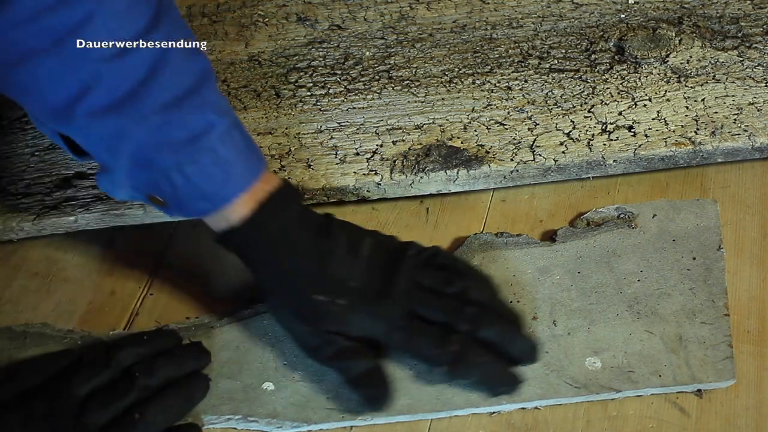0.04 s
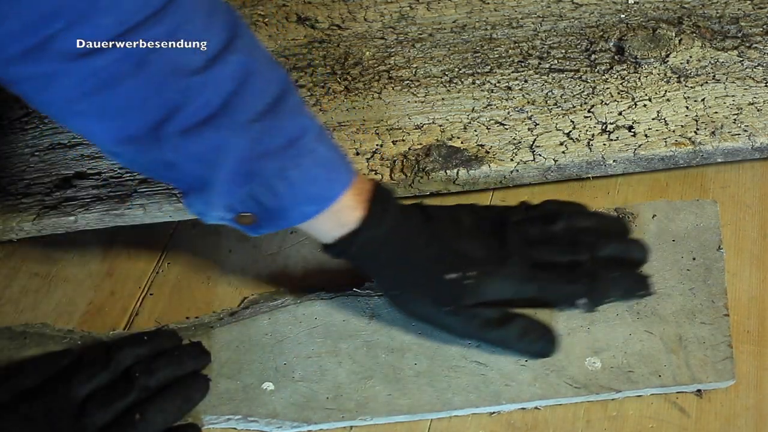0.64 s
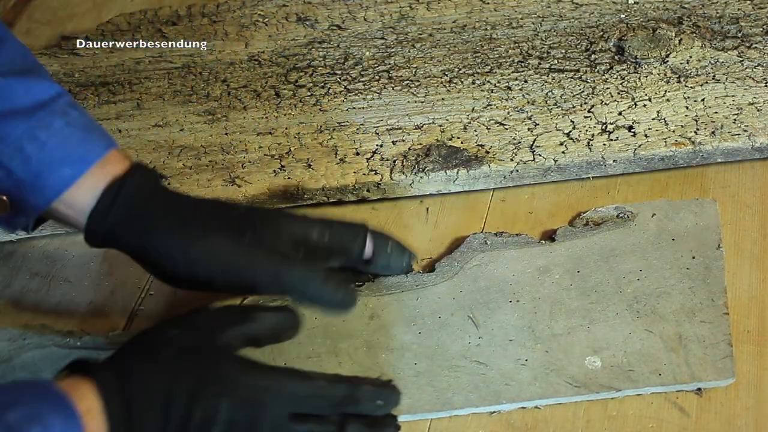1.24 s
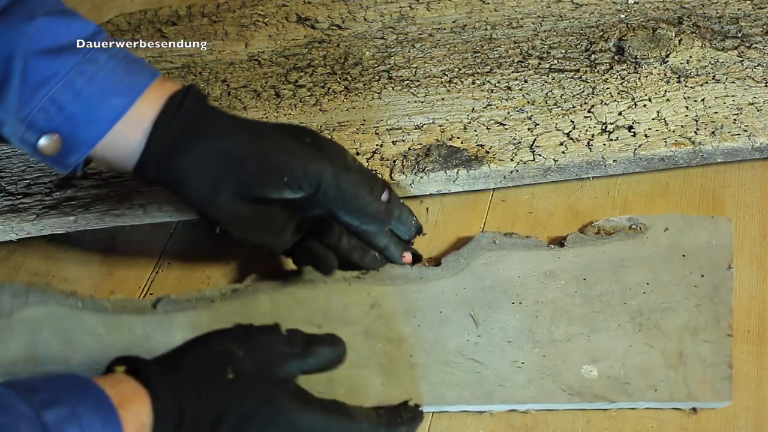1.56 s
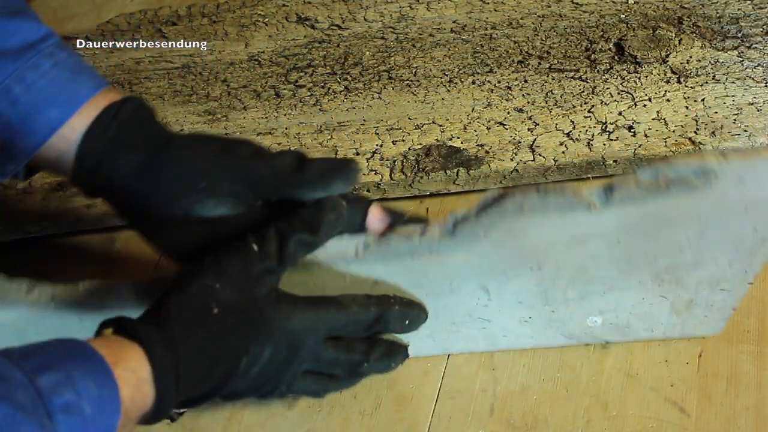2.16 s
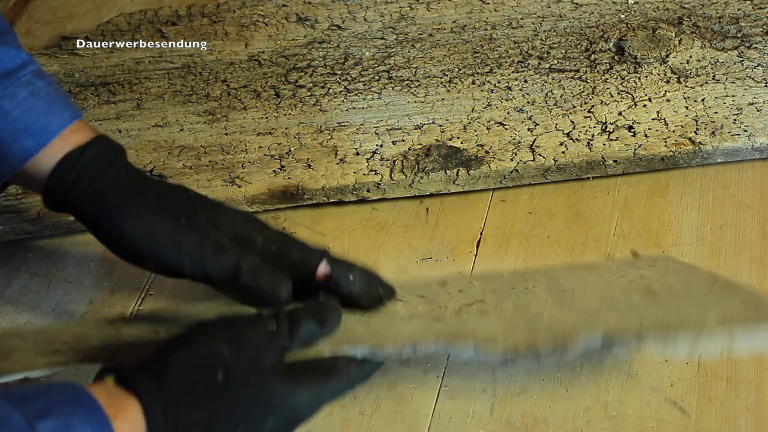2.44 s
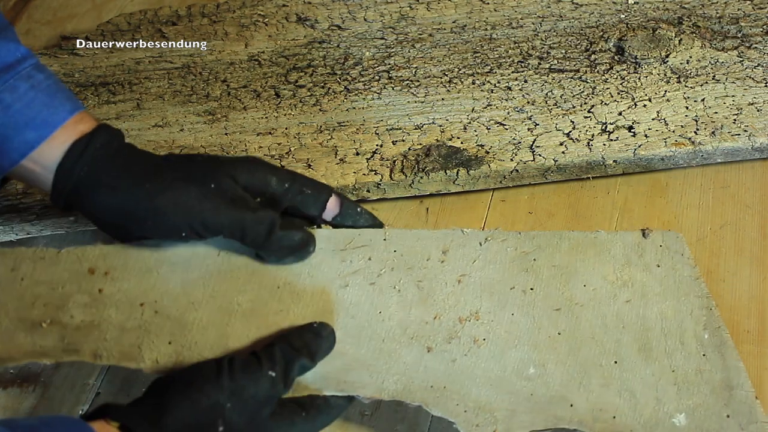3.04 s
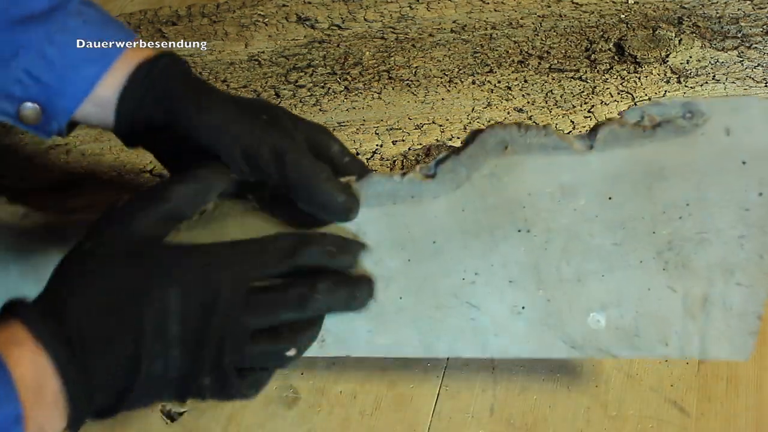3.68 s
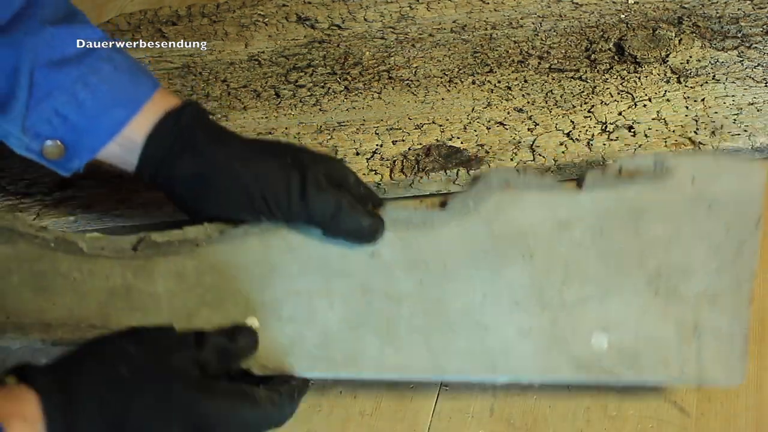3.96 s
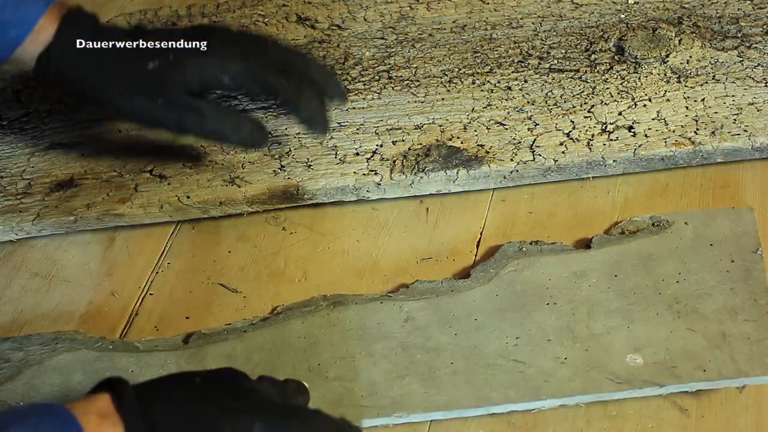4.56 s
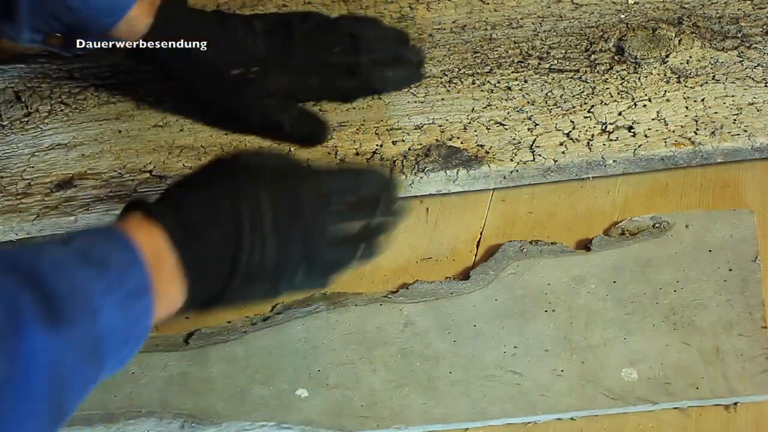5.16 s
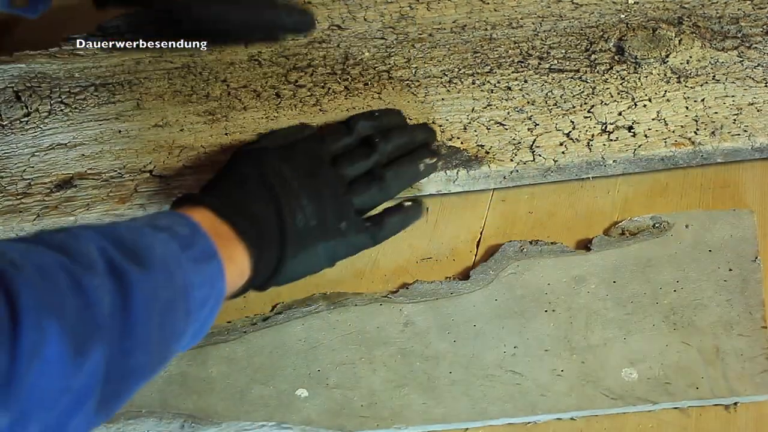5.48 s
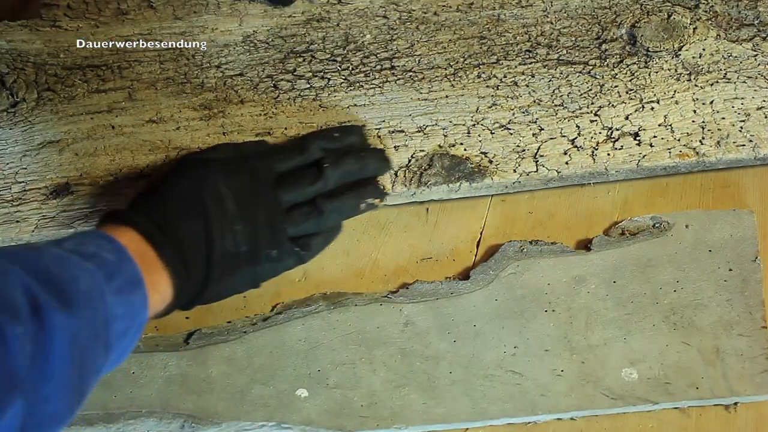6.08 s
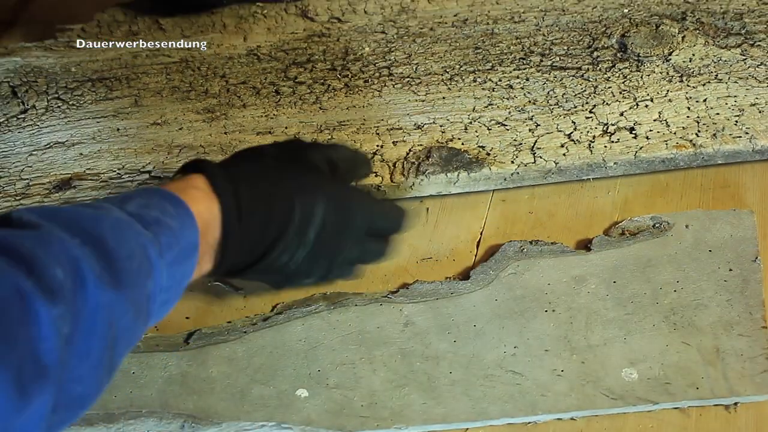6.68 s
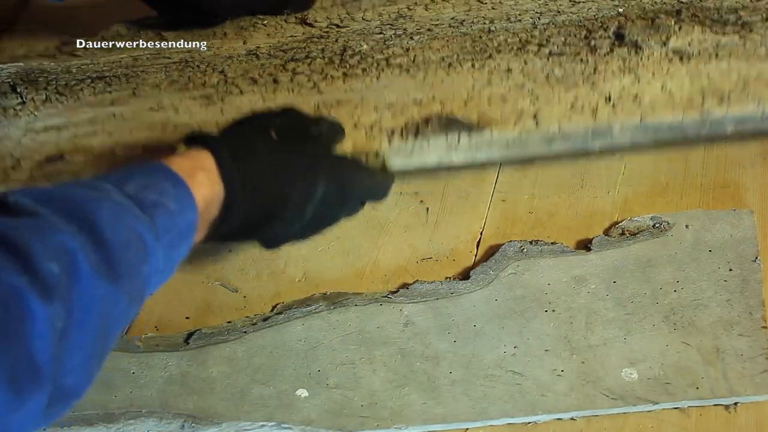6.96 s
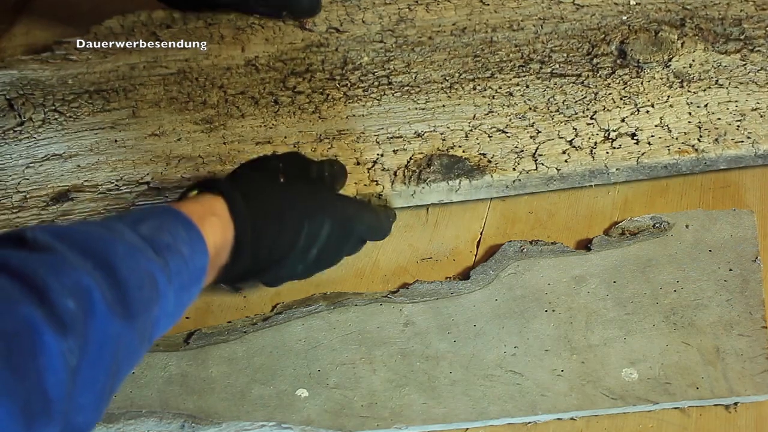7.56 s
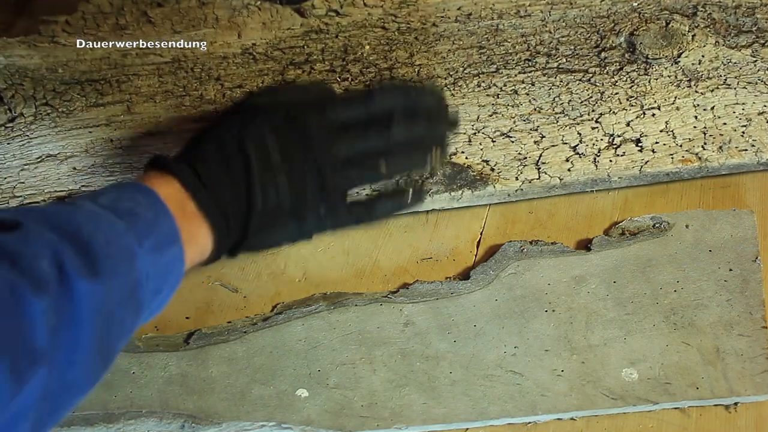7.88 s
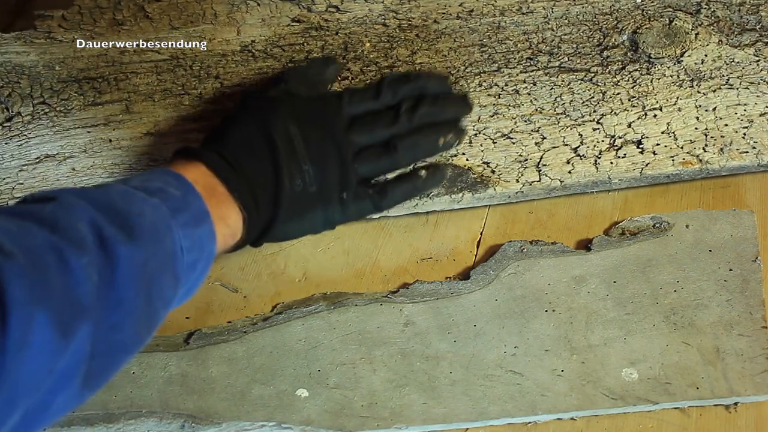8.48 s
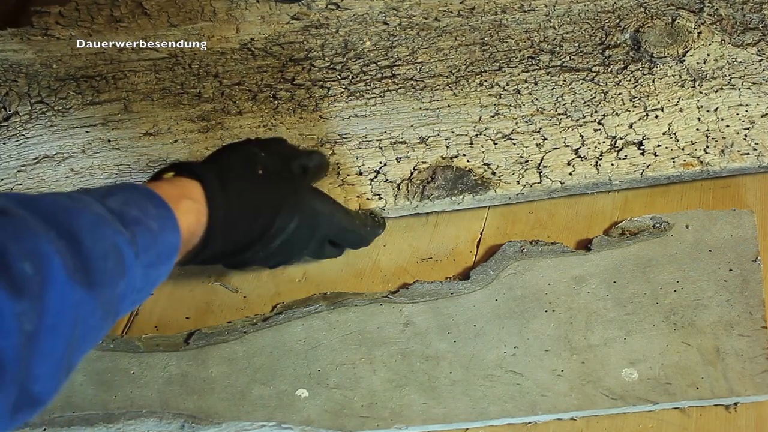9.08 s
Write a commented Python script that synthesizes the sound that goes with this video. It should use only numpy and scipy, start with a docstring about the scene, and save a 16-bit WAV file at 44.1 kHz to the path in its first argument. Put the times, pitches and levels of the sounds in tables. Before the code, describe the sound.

In a small workshop, heard close up over a faint steady hush, gloves brush across weathered wood with light cloth rustles and ticks of grit. A thin board rattles against the workbench in a quick run of knocks and is set down. A heavier plank is rubbed and bumps softly, then lands with a loud wooden clatter, followed by three separate knocks and a last soft rub.

```python
"""Gloved hands stroke a thin old board on a wooden workbench, turn it over and back, and lay it down.
They then rub a thick weathered plank, lift it, let it drop and knock it on the bench three times.
Each blow rings the wood's damped modes over the thump of the bench. Snagging fibres make the gloves
rasp and the sleeves rustle and swish; grit ticks, bark crackles, edges scrape and squeak.
A small workshop answers the blows, heard in close stereo over a steady hush."""
import sys
import numpy as np
from scipy import signal
from scipy.fft import rfft, irfft, next_fast_len
from scipy.io import wavfile
from scipy.ndimage import map_coordinates

SR = 44100
rng = np.random.default_rng(int(sys.argv[2]) if len(sys.argv) > 2 else 0)


def bounce(signal):
    """Save signal as a 16-bit WAV file at the path given by the first command-line argument."""
    frames = np.transpose(np.atleast_2d(signal))
    limited = np.clip(frames, -1, 1)
    pcm = np.round(limited * 32767).astype(np.int16)
    wavfile.write(sys.argv[1], SR, pcm)


N = 411012

# thin board modes: freq_hz, width_hz, face_db, edge_db
BOARD_MODES = [(136, 12, 3.5, 6.5), (171, 16, 6, -1), (200, 5.7, 14.5, 17), (229.3, 21, 13.5, 6),
               (274, 37, 5, 10.5), (331.2, 15.4, 8.5, 17.5), (485.5, 11, 14, 1), (570, 45, 7, 0),
               (645, 12.6, 8.5, 14), (715, 52, 0.5, 9.5), (761, 20, 7.5, 11), (810, 16, 10.5, 4.5),
               (1013, 23, 7, -7), (1136, 11, 9, -31), (1266, 23, 11, 4), (1357, 35, -0.5, 8),
               (1453, 39, 4, 3), (1612, 14, 8.5, -6), (1740, 21, 5, -28), (1893, 8.5, 0.5, -11),
               (2087, 44, 6, -1), (2200, 31, -2, 10), (2634, 51, -3, 4), (2870, 29, 12, -4),
               (3230, 28, 0, 20), (3900, 150, 8, 7)]
# board on bench: start_s, level_db, corner_hz (harder is higher), thump_db, node_hz, edge_fraction
BOARD_BLOWS = [(1.433, -42, 460, 2, 510, .5), (2.171, -33, 414, 4, 724, 0.65),
               (2.238, -25, 420, -0.5, 332, 0.6), (2.327, -29, 517, -9, 224, 0.28),
               (2.406, -21.5, 626, -10, 654, .3), (2.444, -30, 585, -16, 232, 0),
               (2.591, -27.5, 1040, -10, 540, 0.1), (2.751, -24, 2700, 0, 244, 0.12),
               (4.168, -24, 1870, -7, 1090, 1), (4.480, -35, 4700, -8, 690, 0.8),
               (4.518, -21.5, 1930, 2.5, 497, 0.12), (4.825, -32.5, 362, 6.5, 640, 0.64)]
def board():
    """The thin board tips and claps on the bench; modes with a node at the contact stay quiet."""
    out = np.zeros((2, N))
    for s, db, corner_hz, thump_db, node_hz, edge in BOARD_BLOWS:
        modes = struck(BOARD_MODES, edge)
        clap = knock(modes, corner_hz, thump_db, ring_db=25.5, grain_t60=0.084, grit_db=-44, wet_db=-8)
        notch_db = lambda hz: 8.7 * np.exp(-(np.log((hz + 1) / node_hz) / 0.15) ** 2)
        add(out, s, colour(clap, lambda hz: amp(db - notch_db(hz))))
    return out


# thick plank modes: freq_hz, width_hz, face_db, edge_db
PLANK_MODES = [(141.5, 6.6, 8, -5), (199.8, 12.2, 10.5, -0.5), (295.7, 29, 6.5, 7.5), (315, 24, -1.5, 9),
               (352, 46, 6.5, 3.5), (420.5, 19, -8, 8.5), (500, 31, 5.5, 1.5), (550, 35, 8, 4.5),
               (869, 23, -2, 11), (1000, 28, -10, -8), (1037, 37, 5.5, -22), (1133, 47, 8.5, -34),
               (1231, 30, 10, 3), (1322, 15, -1, 7.5), (1390, 76, 3, 2.5), (1618, 15, 1, 8.5),
               (1840, 7.9, -3, 2), (2190, 20, 4, -6)]
# plank on bench: start_s, level_db, corner_hz, thump_db, edge_fraction
PLANK_BLOWS = [(5.198, -42, 320, 16, 0.8), (5.229, -41.5, 267, 6, 0.7), (5.276, -37.5, 218, 9.5, 0.9),
               (6.562, -52, 2480, 9, 0.4), (6.768, -43, 280, -10, 0), (6.787, -39.5, 596, 7, 0.6),
               (7.123, -45, 303, 7.5, 0.2), (7.139, -51, 890, -9, 0.5), (7.443, -53, 2440, 18, 0.2),
               (7.621, -22, 473, -28, 0.73), (7.642, -15, 990, -14, 1), (7.682, -23, 560, -18, 0.66),
               (8.166, -30, 770, 0, 0), (8.438, -29.5, 815, 2.5, 0), (8.685, -22, 800, -2.5, 0.03),
               (8.961, -57, 300, 16, 0.4), (9.117, -45.5, 252, 1, 0.6)]
def plank():
    """The thick plank is pressed, lifted, dropped on its edge and knocked flat."""
    out = np.zeros((2, N))
    for s, db, corner_hz, thump_db, edge in PLANK_BLOWS:
        modes = struck(PLANK_MODES, edge)
        blow = knock(modes, corner_hz, thump_db, ring_db=24.5, grain_t60=0.092, grit_db=-38, wet_db=-8.5)
        add(out, s, amp(db) * blow)
    return out


# workbench modes: freq_hz, width_hz, level_db
BENCH_MODES = [(74.7, 4.4, 10), (84.7, 14, 2), (105.6, 2.9, 2.5), (135.7, 8.4, -5), (158, 3.9, 1.5)]
# crowded, quickly damped wood modes: freq_hz, level_db
GRAIN_SPECTRUM = [(30, -2.5), (70, -8), (130, -1), (300, -2.5), (700, -3), (1500, -1.5), (3000, -1.5),
                  (4500, -1.5), (6500, -10), (15000, -19)]
def knock(modes, corner_hz, thump_db, ring_db, grain_t60, grit_db, wet_db, slap_lag_s=0.004, slap_db=-4):
    """One blow: the wood's main and crowded modes over the bench's thump, softened by the contact time."""
    # one edge touches first, then the face slaps down
    grain = burst(grain_t60)
    add(grain, slap_lag_s, amp(slap_db) * burst(grain_t60))
    wood = amp(ring_db) * ring(modes, rise_s=0.00063) + amp(35) * shaped(grain, GRAIN_SPECTRUM)
    bench = amp(thump_db + 13.5) * ring(BENCH_MODES, rise_s=0.0051)  # heavy, slow to start
    # grit lets a little treble past the soft contact
    contact = lambda hz: 1 / np.hypot(1, (hz / corner_hz) ** 3) + amp(grit_db)
    # boards are too small to radiate deep bass
    radiation = lambda hz: 1 / np.hypot(1, (56 / (hz + 1)) ** 5)
    return colour(workshop(wood, wet_db) + bench, lambda hz: contact(hz) * radiation(hz))


def struck(modes, edge):
    """Rows of freq_hz, width_hz, level_db for a blow between the face (0) and the edge (1)."""
    return [(hz, width, face_db + edge * (edge_db - face_db)) for hz, width, face_db, edge_db in modes]


def ring(modes, rise_s):
    """Damped sines of total energy 1; they swell while the waves cross the wood."""
    t = np.arange(SR // 2) / SR
    x = np.zeros(len(t))
    for k, (hz, width_hz, db) in enumerate(modes):
        envelope = amp(db) * width_hz * np.exp(-np.pi * width_hz * t)
        x += (-1) ** k * envelope * np.sin(2 * np.pi * hz * t)
    x *= 1 - np.exp(-t / rise_s)
    return x / np.linalg.norm(x)


# hand strokes: start_s, rise_s, fall_s, glove_db, sleeve_db, drum_db
HAND_STROKES = [(-0.08, 0.33, 0.19, -48.5, -62.5, -56), (.29, 0.066, 0.086, -47, -77, -72),
                (.39, 0.091, 0.1, -51, -65.5, -74), (.75, 0.019, .03, -50, -74, -74),
                (0.582, 0.27, 0.33, -50.5, -67.5, -63), (.95, 0.035, 0.075, -62.5, -72, -65),
                (1.15, 0.2, 0.09, -61, -73, -78), (1.43, 0.02, 0.35, -58, -78, -64.5),
                (1.478, .012, 0.016, -49, -63, -70), (1.73, 0.011, 0.29, -55, -73, -64),
                (2.17, 0.064, 0.14, -64, -74, -68), (2.28, 0.036, 0.065, -54.5, -65, -67),
                (2.38, 0.19, 0.14, -56.5, -72, -68), (2.88, 0.05, 0.51, -66.5, -85, -81),
                (3.36, 0.067, 0.38, -61.5, -70.5, -86), (3.58, 0.11, 0.31, -61, -72, -90),
                (4.1, 0.17, .14, -56.5, -75, -57.5), (4.36, 0.34, 0.16, -58.5, -80, -70),
                (4.77, 0.07, 0.035, -56.5, -82, -69), (4.95, 0.052, 0.074, -62.5, -65.5, -63),
                (5.1, 0.16, 0.29, -58, -68, -65.5), (5.541, .1, 0.097, -60.5, -74, -66),
                (5.74, 0.029, 0.31, -59.5, -84, -69), (5.97, 0.16, 0.24, -64, -71.5, -90),
                (6.54, 0.017, 0.15, -60, -72, -72), (6.76, 0.038, 0.055, -61, -67, -66),
                (6.81, 0.049, 0.073, -54, -76, -61), (7.43, 0.19, 0.16, -61, -74, -63),
                (7.55, 0.076, 0.068, -59.5, -72, -70), (7.73, 0.082, 0.1, -55.5, -75.5, -75),
                (7.77, 0.026, .04, -54.5, -66, -62), (8.95, 0.037, 0.12, -51.5, -66.5, -60),
                (9.06, 0.072, 0.065, -57, -71, -60), (9.18, 0.048, 0.11, -66, -79, -73)]
def hands(speed_exponent=0.82):
    """In each stroke the hand speeds up and slows to rest; rasp, rustle and drumming follow its speed."""
    t = np.arange(N) / SR
    power = np.full((3, N), 1e-12)
    for s, rise_s, fall_s, *levels_db in HAND_STROKES:
        end_s = s + rise_s + fall_s
        moving = (t > s) & (t < end_s)
        phase = np.interp(t[moving], [s, s + rise_s, end_s], [0, np.pi / 2, np.pi])
        speed = np.abs(np.sin(phase))
        power[:, moving] += np.outer(amp(levels_db), speed ** speed_exponent) ** 2
    glove_db, sleeve_db, drum_db = 10 * np.log10(power)
    judder_db = wobble(45)
    return gloves(glove_db, judder_db) + sleeves(sleeve_db) + drumming(drum_db + judder_db)


# rubbed wood resonances: centre_hz, q, level_db
RUBBED_MODES = [(1140, 28, -3), (1345, 20, 2), (1570, 25, -2), (1900, 28, -6), (2430, 22, -1),
                (2750, 18, 1)]
# glove rasp: freq_hz, level_db
RASP_SPECTRUM = [(240, -42.5), (450, 1.5), (650, -4.5), (800, -0.5), (960, -3), (1350, -1), (2200, 1),
                 (2650, -3), (3500, -2), (6500, -11), (8500, -15.5), (12000, -41)]
# hollow body of the wood: freq_hz, level_db
BODY_SPECTRUM = [(90, -26), (300, -5), (750, -1), (1300, -5), (2500, -23)]
def gloves(level_db, judder_db):
    """Gloves rasp over weathered wood, which adds its resonances and hollow body."""
    fibres = friction(rate_hz=4000, size_spread_db=-1.5, hiss=1.0)
    ringing = sum(amp(db) * resonance(fibres, hz, q) for hz, q, db in RUBBED_MODES)
    rasp = unit(shaped(fibres + ringing, RASP_SPECTRUM))
    body = unit(shaped(friction(rate_hz=1500, size_spread_db=2.5, hiss=0.84), BODY_SPECTRUM))
    # the body grows more slowly than the rasp, so light strokes sound duller
    return rasp * amp(level_db + 1.12 * judder_db) + body * amp(0.66 * level_db - 29 + 0.37 * judder_db)


# sleeve rustle: freq_hz, level_db
CLOTH_SPECTRUM = [(200, -8), (1500, -11), (4000, 2), (8000, 2.5), (11000, -2.5), (15500, -18.5)]
# fine hiss of a brisk sleeve: freq_hz, level_db
CRISP_SPECTRUM = [(3000, -28), (8000, -4), (12000, -4), (15500, -3)]
def sleeves(level_db, brisk_db=-58.5, crisp_db_per_db=0.85):
    """Sleeves rustle, turning crisper as the arm moves faster."""
    cloth = unit(shaped(friction(rate_hz=4200, size_spread_db=3, hiss=1.0), CLOTH_SPECTRUM))
    crisp = unit(shaped(friction(rate_hz=4200, size_spread_db=-4, hiss=0.9), CRISP_SPECTRUM))
    crisp *= amp(crisp_db_per_db * (level_db - brisk_db) - 5)
    return (cloth + crisp) * amp(level_db + 4 + 0.68 * wobble(32))


# wood drumming on the bench: freq_hz, level_db
DRUM_SPECTRUM = [(24, -62), (40, -46), (75, 8.5), (155, -4), (289, 4), (404, -8), (700, -4), (910, -31.5),
                 (1540, -120)]
def drumming(level_db):
    """The stroked wood drums faintly on the bench."""
    bumps = friction(rate_hz=250, size_spread_db=2.5, hiss=0.99)
    return amp(level_db) * unit(shaped(bumps, DRUM_SPECTRUM))


# small catches: start_s, level_db, centre_hz, q
CATCHES = [(1.434, -46.5, 2400, 0.9), (1.488, -46, 2200, 0.6), (1.741, -52, 3080, 1.1),
           (2.326, -46.5, 2840, 6), (2.408, -55, 2600, 3), (2.752, -45, 5170, 1.55),
           (4.053, -51.5, 4430, 1), (4.837, -41, 1740, 0.66), (5.765, -60, 10000, 1.1),
           (5.787, -57, 5200, 1.5), (5.826, -50.5, 2980, 1.14), (6.563, -44.5, 1730, 3.2),
           (7.444, -53, 2280, 4.8), (8.167, -54, 3730, 1.3), (8.44, -56, 2950, 1.1),
           (8.686, -52, 2940, 2.1), (8.956, -55.5, 2480, 0.6)]
def ticks():
    """Splinters, grit and glove seams catch: a short noise burst in one resonance."""
    out = np.zeros((2, N))
    for s, db, centre_hz, q in CATCHES:
        snap = resonance(resonance(burst(t60=0.044), centre_hz, q), centre_hz, q)
        add(out, s, amp(db + 23) * workshop(snap / np.linalg.norm(snap[0]), wet_db=-7))
    return out


# wood dragging on wood: start_s, length_s, centre_hz, level_db
DRAGS = [(1.87, 0.065, 750, -55.5), (1.875, 0.11, 527, -55), (1.88, 0.055, 1170, -60),
         (3.018, 0.08, 795, -60.5), (5.768, 0.042, 745, -65), (6.878, 0.051, 1900, -58),
         (7.134, 0.022, 755, -55), (9.11, 0.038, 298, -60)]
def scrapes():
    """An edge drags over the bench in uneven slips that sound in one resonance."""
    out = np.zeros((2, N))
    n = SR // 2
    for s, length_s, centre_hz, db in DRAGS:
        slips = spread(rng.standard_normal((2, n))) * amp(1.1 * wobble(152)[:n])
        tone = unit(resonance(resonance(slips, centre_hz, q=4), centre_hz, q=1.2))
        add(out, s, amp(db) * workshop(tone * swell(length_s, n), wet_db=-4))
    return out


# board edge squeak: start_s, length_s, pitch_hz, level_db
SQUEAK_PARTIALS = [(1.742, 0.105, 1220, -58.5), (1.742, 0.045, 3150, -58), (1.742, 0.045, 3930, -63)]
def squeaks(waver_fraction=0.014):
    """As the board is lifted, its edge sticks and slips fast enough to sing in wavering partials."""
    out = np.zeros((2, N))
    n = SR // 2
    for s, length_s, hz, db in SQUEAK_PARTIALS:
        pitch_hz = hz * (1 + waver_fraction * wobble(160)[:n])
        phase = 2 * np.pi * np.cumsum(pitch_hz) / SR
        tone = unit(np.sin(phase) * amp(3 * wobble(110)[:n]))
        add(out, s, amp(db) * workshop(np.array([tone, tone]) * swell(length_s, n), wet_db=-4))
    return out


# brushing cloth: start_s, length_s, centre_hz, level_db
CLOTH_BRUSHES = [(5.19, 0.22, 14000, -69), (5.78, 0.52, 4600, -67), (6.78, 0.13, 5000, -65)]
def brushes():
    """One high, airy sleeve swish and two crackly rubs over bark: snags swell and fade in a broad band."""
    out = np.zeros((2, N))
    snags = friction(rate_hz=700, size_spread_db=4.5, hiss=0.6)
    for s, length_s, centre_hz, db in CLOTH_BRUSHES:
        part = snags[:, round(s * SR):][:, :SR]
        brush = unit(resonance(resonance(part, centre_hz, q=1), centre_hz, q=1))
        add(out, s, amp(db) * brush * swell(length_s, SR))
    return out


# workshop decay: freq_hz, t60_s
ROOM_DECAY = [(70, .5), (190, .43), (330, .27), (1100, .28), (3000, .28), (9000, .22)]
def workshop(x, wet_db, build_s=0.011):
    """x plus the room's answer, which builds as the walls reply and lasts longest in the bass."""
    hz, t, noise = signal.stft(spread(rng.standard_normal((2, SR // 2))), SR, nperseg=256)
    envelope = amp(-60 * t / along(ROOM_DECAY, hz)[:, None]) * (1 - np.exp(-t / build_s))
    tail = signal.istft(noise * envelope, SR, nperseg=256)[1]
    tail /= np.linalg.norm(tail[0])
    return x + amp(wet_db) * signal.fftconvolve(x, tail, axes=1)[:, :x.shape[-1]]


# room tone: freq_hz, level_db
AIR_SPECTRUM = [(20, -5.5), (48, -1), (65, -6), (140, -1.5), (300, -3), (850, -5), (2150, -8.5),
                (5700, -14.5), (11400, -22), (15500, -28)]
def air():
    """The steady hush of the workshop, unrelated on the two sides."""
    return amp(-62) * unit(shaped(rng.standard_normal((2, N)), AIR_SPECTRUM))


# left-right likeness: freq_hz, correlation
STEREO_LIKENESS = [(100, .98), (400, .97), (1000, .88), (2300, .75), (5000, .52), (13000, .2)]
def spread(pair):
    """Two unrelated signals become left and right: alike in the bass, apart in the treble."""
    n = pair.shape[-1]
    m = next_fast_len(n)
    correlation = along(STEREO_LIKENESS, np.fft.rfftfreq(m, 1 / SR))
    angle = np.arccos(np.clip(correlation, -1, 1)) / 2
    mid, side = irfft(rfft(pair, m) * [np.cos(angle), np.sin(angle)], m)[:, :n]
    return np.array([mid + side, mid - side])


def friction(rate_hz, size_spread_db, hiss, diffuse=0.4):
    """Fibres snag and let go at random, in unequal sizes, over a smooth direct and diffuse hiss."""
    snags = (rng.random(N) < rate_hz / SR) * amp(size_spread_db * rng.standard_normal(N))
    direct = spread(unit(snags * rng.standard_normal((2, N))) + hiss * rng.standard_normal((2, N)))
    return direct + diffuse * rng.standard_normal((2, N))


def burst(t60):
    """Dying stereo noise, energy 1 on the left."""
    t = np.arange(SR // 2) / SR
    x = spread(rng.standard_normal((2, len(t)))) * amp(-60 * t / t60)
    return x / np.linalg.norm(x[0])


def swell(length_s, n):
    """A rounded rise and fall, then silence up to n samples."""
    progress = np.minimum(np.arange(n) / SR / length_s, 1)
    return np.sqrt(np.abs(np.sin(np.pi * progress)))


def wobble(rate_hz):
    """A smooth random curve, rate_hz knots a second."""
    knots = rng.standard_normal(int(N * rate_hz / SR) + 4)
    return map_coordinates(knots, [np.arange(N) * rate_hz / SR])


def colour(x, gain):
    """Minimum-phase filter of magnitude gain(hz)."""
    n = x.shape[-1]
    m = 2 * next_fast_len(n // 2 + 4096)
    magnitude = np.maximum(gain(np.fft.rfftfreq(m, 1 / SR)), 1e-6)
    cepstrum = irfft(np.log(magnitude))
    cepstrum[1:m // 2] *= 2
    cepstrum[m // 2 + 1:] = 0
    return irfft(rfft(x, m) * np.exp(rfft(cepstrum)), m)[..., :n]


def shaped(x, spectrum):
    """x coloured by freq_hz, level_db points."""
    return colour(x, lambda hz: amp(along(spectrum, hz)))


def resonance(x, centre_hz, q):
    """x through one resonance."""
    return colour(x, lambda hz: 1 / np.hypot(1, q * (hz / centre_hz - centre_hz / (hz + 1))))


def along(points, hz):
    """Interpolate freq_hz, value points on a log frequency axis."""
    freqs_hz, values = np.transpose(points)
    return np.interp(np.log(hz + 1), np.log(freqs_hz + 1), values)


def amp(db):
    """Decibels to gain."""
    return 10 ** (np.asarray(db) / 20)


def unit(x):
    """Scale to rms 1."""
    return x / np.sqrt(np.mean(x ** 2) + 1e-20)


def add(track, start_s, sound):
    """Mix a sound into the track."""
    start = max(round(start_s * SR), 0)
    part = track[:, start:start + sound.shape[-1]]
    part += sound[..., :part.shape[-1]]


# stereo balance: freq_hz, left_minus_right_db
BALANCE = [(80, .6), (300, -1), (1100, -2), (2200, -.2), (4500, 2), (12000, .7)]
def scene():
    """All sources; the woody midrange leans a little right, the rustling treble left."""
    left, right = board() + plank() + ticks() + scrapes() + squeaks() + brushes() + hands() + air()
    left = colour(left, lambda hz: amp(along(BALANCE, hz) / 2))
    right = colour(right, lambda hz: amp(-along(BALANCE, hz) / 2))
    return np.array([left, right])


def record(dry):
    """A sharp low-pass removes the highest treble."""
    cutoff_hz = 15750
    m = next_fast_len(N + SR // 2)
    passband = np.fft.rfftfreq(m, 1 / SR) < cutoff_hz
    return irfft(rfft(dry, m) * passband, m)[:, :N]


dry = scene()
out = record(dry)
bounce(out)
```